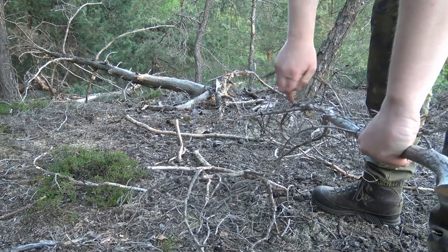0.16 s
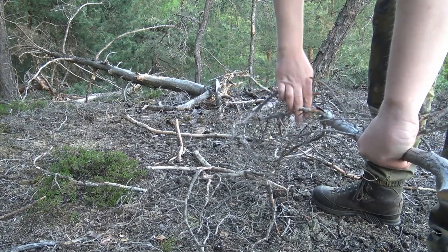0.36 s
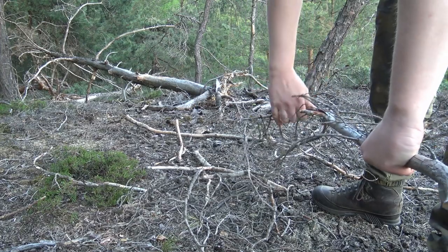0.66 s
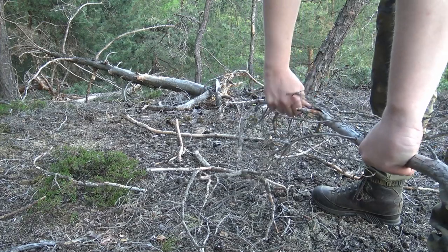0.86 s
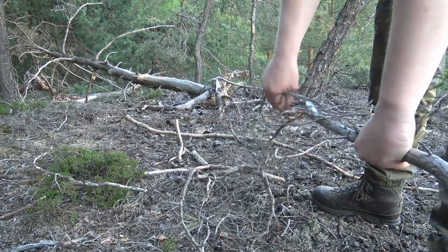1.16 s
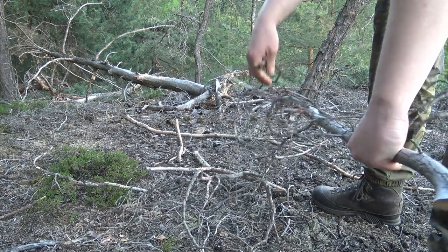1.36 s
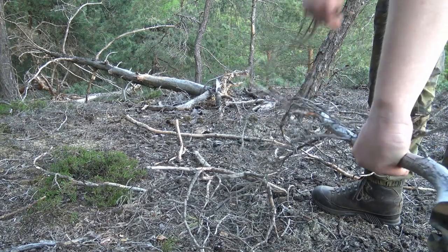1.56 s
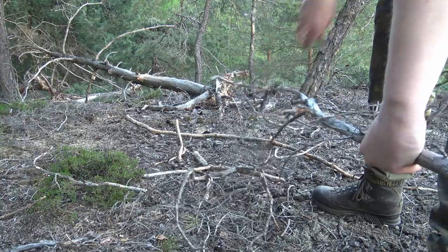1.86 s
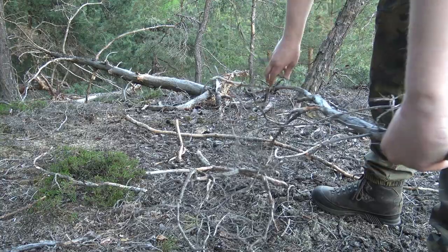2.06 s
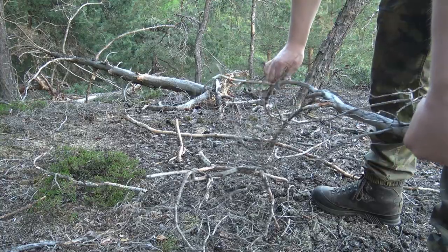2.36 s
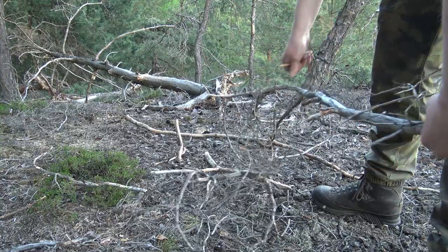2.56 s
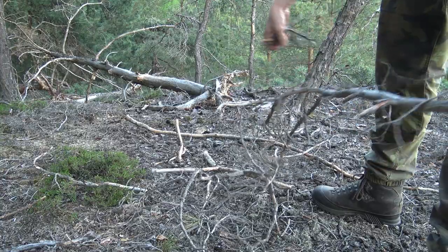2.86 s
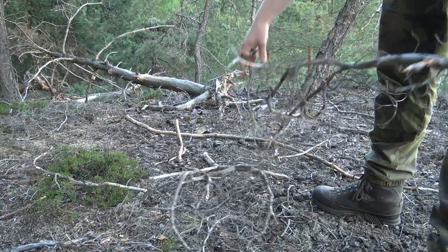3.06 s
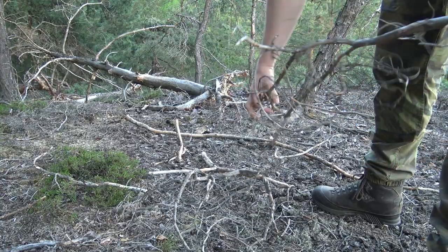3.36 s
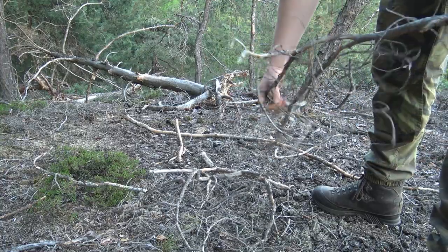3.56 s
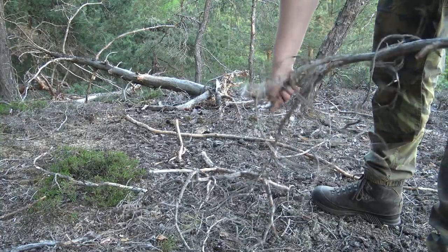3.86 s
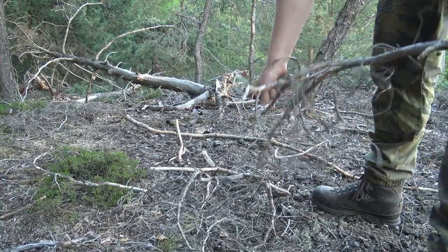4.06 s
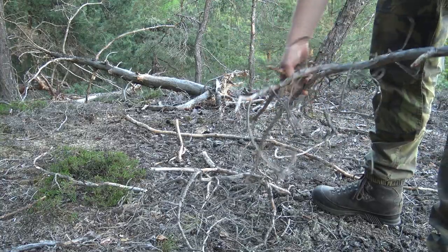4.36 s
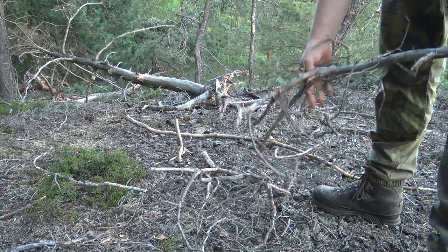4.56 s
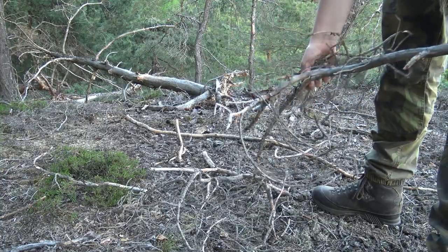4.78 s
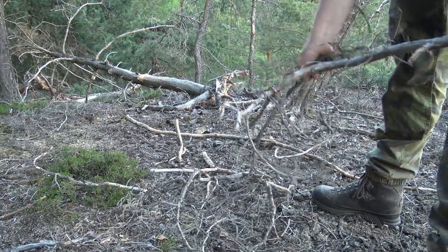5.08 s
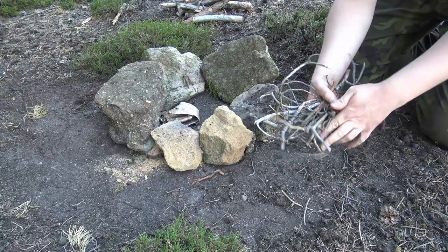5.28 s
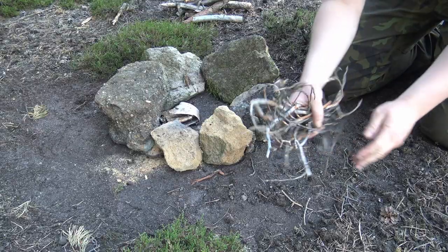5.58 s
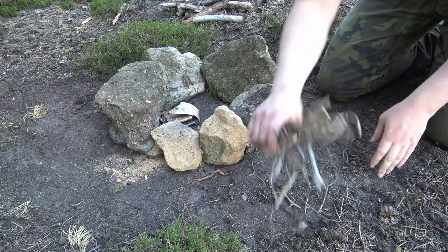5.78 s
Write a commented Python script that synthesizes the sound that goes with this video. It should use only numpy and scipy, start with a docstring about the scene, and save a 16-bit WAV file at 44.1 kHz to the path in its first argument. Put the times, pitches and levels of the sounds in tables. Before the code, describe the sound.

Outdoor stereo pickup close to a brittle branch being handled. Irregular cracks cluster around one second, pause, then return sharper and denser through the middle, over hissing twig rustle and dull knocks. A nearby bird's quick warble, a farther low whistle and thin high peeps fill the gaps. Finally the rustle fades and dry twigs land with a short, low thud in still air.

```python
"""Dry twigs are pulled and snapped off a dead branch close by: noise tears, a short ring and splinter fizz.
They scrape and rustle between the cracks: patchy noise with tiny clicks, over dull knocks of damped tones.
A near bird warbles, a farther one whistles low and a tiny one seeps high, all as gliding sines.
Echoes among pine trunks and a noise floor of still air surround them.
At the end a bundle of twigs drops on the ground with a thud."""
import sys
import numpy as np
from scipy import signal
from scipy.fft import rfft, irfft, next_fast_len
from scipy.io import wavfile
from scipy.ndimage import uniform_filter1d, minimum_filter1d, map_coordinates

SR = 44100
rng = np.random.default_rng(int(sys.argv[2]) if len(sys.argv) > 2 else 0)


def to_wav(s):
    """Save 16-bit WAV."""
    ch = np.atleast_2d(s).T  # columns
    pcm = np.round(np.clip(ch, -1, 1) * 32767)  # PCM
    wavfile.write(sys.argv[1], SR, pcm.astype(np.int16))


N = 261072


def amp(db):
    """Turn decibels into a plain factor."""
    return 10 ** (np.asarray(db) / 20)


def unit(x):
    """Scale a signal to an rms of 1."""
    return x / np.sqrt(np.mean(x ** 2) + 1e-20)


def along(points, hz):
    """Read a curve of (f/Hz, value) points on a log frequency axis."""
    f, v = np.transpose(points)
    return np.interp(np.log(hz + 1), np.log(f + 1), v)


def curves(rows):
    """Give one value per sample for each column after the time."""
    times, *columns = np.transpose(rows)
    return [np.interp(np.arange(N) / SR, times, column) for column in columns]


def wobble(rate):
    """Draw a smooth random curve with this many random knots a second."""
    knots = rng.standard_normal(int(N * rate / SR) + 4)
    return map_coordinates(knots, [np.arange(N) * rate / SR])


def filtered(x, response):
    """Filter x by a complex response of frequency."""
    m = next_fast_len(x.shape[-1] + 4096)
    return irfft(rfft(x, m) * response(np.fft.rfftfreq(m, 1 / SR)), m)[..., :x.shape[-1]]


def peak(hz, centre_hz, q):
    """A resonance of gain 1 at its centre, which rings only after it is struck."""
    damping = 1j * hz * centre_hz / q
    return damping / (centre_hz ** 2 - hz ** 2 + damping)


# steady fumbling with the branch: [t/s, thin twigs level/dB, thick wood level/dB]
GRIP_LEVELS = [(0.0, -42, -47), (0.18, -45.5, -51.5), (0.45, -44, -48), (0.88, -45.5, -52.5),
               (1.36, -47, -46.5), (1.54, -45, -54.5), (1.84, -46.5, -58), (2.0, -42, -57.5),
               (2.6, -41.5, -50.5), (2.79, -48.5, -45.5), (3.07, -55, -55), (3.5, -47.5, -53),
               (3.8, -40.5, -48), (4.27, -48.5, -56.5), (5.1, -43.5, -51.5), (5.33, -48, -61.5),
               (5.56, -59.5, -63), (5.92, -55.5, -55.5)]
# tugs that shake the branch: [t/s of the peak, twigs level/dB, wood level/dB, rise t/s, 60 dB fade t/s]
BRANCH_TUGS = [(0.25, -40.5, -54, 0.35, 0.9), (0.931, -31, -62, 0.044, 0.67),
               (0.974, -29, -30.5, 0.061, 0.19), (1.16, -39.5, -61, 0.27, 1.6),
               (2.48, -41, -56, 0.048, 2.1), (2.748, -35, -37.5, 0.048, 0.16),
               (2.831, -34.5, -38.5, 0.011, 0.86), (3.24, -38, -48.5, 0.26, 1.06),
               (3.51, -34.5, -45.5, 0.049, 0.064), (3.77, -46, -58, 1, 0.76),
               (3.878, -31, -38, 0.073, 0.59), (4.45, -40, -45.5, 0.74, 0.52),
               (4.688, -32, -41.5, 0.27, 0.71), (4.909, -32, -38, 0.022, 0.41),
               (5.233, -34, -47.5, 0.21, 0.23)]


def effort():
    """Gains of twigs and wood: the steady grip plus each tug, which swells and dies away."""
    t = np.arange(N) / SR
    power = amp(curves(GRIP_LEVELS)) ** 2
    for peak_s, twig_db, wood_db, rise_s, t60 in BRANCH_TUGS:
        rise_db = 40 * (t - peak_s) / rise_s  # it gains 40 dB during its rise
        fade_db = -60 * (t - peak_s) / t60
        shape_db = np.where(t < peak_s, rise_db, fade_db)
        power = power + amp([[twig_db], [wood_db]]) ** 2 * amp(shape_db) ** 2
    return np.sqrt(power)


def crackle(spectrum, rate, spread_db, life, share, patchy_db, patch):
    """Rubbing: patchy noise, gated in part by tiny bursts of very uneven size."""
    z = signal.stft(rng.standard_normal(N), nperseg=256)[2]
    # patch holds the smoothing widths across frequency and across time
    field = uniform_filter1d(rng.standard_normal(z.shape), size=patch[0], axis=0)
    field = uniform_filter1d(field, size=patch[1], axis=1)
    noise = signal.istft(z * amp(patchy_db * unit(field)), nperseg=256)[1][:N]
    sizes = amp(spread_db * np.minimum(rng.exponential(size=N), 1.7))
    starts = (rng.random(N) < rate / SR) * sizes
    fade = np.exp(-1 / (life * SR))
    bursts = signal.lfilter([1], [1, -fade], starts)  # a sudden start, then a fade
    share = np.clip(share, 0, 1)
    gate = np.sqrt(1 - share + share * unit(bursts) ** 2)
    return unit(filtered(noise * gate, lambda hz: amp(along(spectrum, hz))))


def ticks(rate, spread_db, centre_hz, octaves, cycles):
    """Bark flakes and twig tips flick off: each a click of a few cycles at its own pitch."""
    draws = rng.random((round(rate * N / SR), 2))  # place and size of each click
    hz = centre_hz * 2 ** (octaves * rng.standard_normal((len(draws), 1)))
    turns = np.minimum(hz, SR / 3) * np.arange(512) / SR
    size = amp(-spread_db * np.log(np.maximum(draws[:, 1:], .05)))
    clicks = size * np.sin(2 * np.pi * turns) * np.exp(-turns / cycles)
    spots = (draws[:, :1] * N).astype(int) + np.arange(512)
    return unit(np.bincount(spots.ravel(), clicks.ravel(), N + 512)[:N])


# colour of the hissing thin twigs: [f/Hz, relative level/dB per Hz]
TWIG_COLOUR = [(710, -18.5), (1200, -0.5), (5450, 1.5), (10300, 0), (14800, -6), (16000, -16), (16500, -43)]
# colour of the scraping thick wood: [f/Hz, relative level/dB per Hz]
WOOD_COLOUR = [(35, -64), (60, -11.5), (178, -5.5), (589, 2.5), (1250, -0.5), (4000, -2.5), (5200, -32),
               (8800, -120)]


def handling():
    """Thin twigs hiss and tick, thick wood scrapes lower; each jerk of the hand shakes both."""
    twig_gain, wood_gain = effort()
    jerk = np.clip(wobble(30), -3, 1.5)
    twigs = crackle(TWIG_COLOUR, rate=260, spread_db=4, life=.0018, share=.45, patchy_db=3.6, patch=(19, 3))
    twigs = twigs + amp(-12) * ticks(rate=240, spread_db=5, centre_hz=7000, octaves=.8, cycles=1.6)
    wood = crackle(WOOD_COLOUR, rate=110, spread_db=4.5, life=.003, share=.25, patchy_db=4, patch=(2, 12))
    wood = wood + amp(-7) * ticks(rate=140, spread_db=2.5, centre_hz=1500, octaves=.8, cycles=6)

    def balance():
        """A slow random left-right level wobble."""
        return amp(0.77 * wobble(7.3) * np.array([[1], [-1]]))

    rustle = twig_gain * amp(2.65 * jerk) * twigs * balance()
    scrape = wood_gain * amp(1.7 * jerk) * wood * balance()
    return rustle + scrape


# colour of the still air, with a far drone near 1 kHz: [f/Hz, relative level/dB per Hz]
AIR_COLOUR = [(20, -5), (60, 12.5), (200, 11.5), (700, 6.5), (950, 2), (1120, 24), (1350, -28), (3500, -7),
              (5300, -24), (15000, -31), (16500, -34)]
# how alike the air sounds on the left and right: [f/Hz, likeness from 0 to 1]
AIR_LIKENESS = [(60, 0.88), (380, 0.55), (2380, 1), (15000, 0.96)]


def air():
    """Still air is a gently wavering noise floor; a shared and an opposed noise set how alike the sides are."""
    def colours(hz):
        turn = np.arccos(np.clip(along(AIR_LIKENESS, hz), -1, 1)) / 2
        return amp(along(AIR_COLOUR, hz)) * [np.cos(turn), np.sin(turn)]

    mid, side = filtered(rng.standard_normal((2, N)), colours)
    return amp(-62.0 + 0.7 * wobble(4.3)) * unit(np.array([mid + side, mid - side]))


# echoes among the trunks: [f/Hz, 60 dB fade t/s]
TRUNK_ECHOES = [(300, 0.57), (3000, 0.61), (12000, 0.4)]


def trees(x):
    """Each frequency of the echo dies at its own speed; the two sides differ a little."""
    hz, t, z = signal.stft(rng.standard_normal((2, SR // 2)), SR, nperseg=256)
    fade = amp(-60 * t / along(TRUNK_ECHOES, hz)[:, None])
    mid, side = signal.istft(z * fade, SR, nperseg=256)[1]
    tail = (mid + amp(-34.0) * side * [[1], [-1]]) / np.linalg.norm(mid)
    late = np.pad(x, (300, 0))  # the first echo comes 300 samples late
    return signal.fftconvolve(late[None], tail, axes=1)[:, :N]


# snaps: [t/s, nominal peak level/dB, ring f/Hz, woody part setting level/dB, brittle parts setting level/dB]
TWIG_SNAPS = [(0.2201, -13.5, 1430, -15, -8), (0.249, -20.5, 12500, -28, -22), (0.3538, -20, 3700, 3, -17),
              (0.3653, -20, 1640, -7, -15), (0.628, -21.5, 1790, 1, -9), (0.688, -28, 4600, -8, -26),
              (0.7989, -16, 9500, 15, 20.5), (0.8974, -22.5, 9000, -30, 6), (0.9189, -5, 2560, -14, -9),
              (0.9422, -12, 2300, -43, -12), (0.9681, -11.5, 4640, -21, -11), (0.99, -24, 2720, -3, -14),
              (1, -19, 2500, -5, -19), (1.012, -18, 1410, -3, -33), (1.046, -22, 2770, 0, -35),
              (1.138, -20, 7060, -20, -3), (1.157, -19, 10300, -25, 10), (1.212, -23, 2080, -7, -44),
              (1.2215, -19, 2490, -14, -54), (1.2387, -14, 2490, -13, -64), (1.3798, -16, 2390, 4, -30),
              (1.596, -20, 1880, -48.5, -2), (1.93, -12, 10000, -5.5, -10.5), (2.2373, -21.5, 5770, 0, -11),
              (2.469, -4.5, 2460, -17, -8.5), (2.475, -2.5, 5230, -28, 3), (2.736, -17.5, 5970, -38, -29),
              (2.8107, -8.5, 4340, -5, -2), (2.843, -26, 3080, 3, -18), (2.9043, -11, 3440, -17, -18),
              (3.3453, -23, 10100, -25, -6), (3.452, -6.5, 8980, -50, -34), (3.503, -15.5, 11200, -32, -16),
              (3.56, -9, 7000, -15, -32), (3.5656, -6, 8880, -15, -8), (3.6117, -1, 4600, -24, -11),
              (3.6588, -4.5, 4920, -15, -7), (3.8065, -17.5, 3470, -66, -44),
              (3.8187, -4.5, 4850, -12.5, -12), (3.8657, 5.5, 5455, -19.5, -21),
              (3.8887, -10, 10200, -41, -35), (3.926, -10, 5550, -18, -5), (4.4645, -15, 9200, -3.5, -9),
              (4.552, -7.5, 3400, -40, -9.5), (4.6755, -11, 9200, -17, -12), (4.79, -6.5, 9300, -12, -5),
              (4.85, -8, 8600, -49, -11), (4.8828, 4, 5760, -8.5, -15), (4.9108, -10.5, 3950, -11, -8),
              (5.1043, -25, 2090, -2, -10), (5.214, -13.5, 6600, -19, -29), (5.237, -17.5, 4970, -22, -35),
              (5.4306, -26.5, 3530, -35, -20), (5.4837, -24, 4160, -18, -20),
              (5.801, -27.5, 1860, -19, -10)]


def snaps():
    """Fibres tear for a few ms, the stub rings briefly (thick, low stubs longer), splinters keep fizzing."""
    crest_db = 14  # nominal peak over the rms of the first 256 samples (about 6 ms)
    out, t = np.zeros((2, N + SR)), np.arange(SR // 8) / SR
    parting = amp(2.5) * np.exp(-((t - .0011) / .0002) ** 2)  # the last fibres let go at once
    for s, db, hz, woody_db, brittle_db in TWIG_SNAPS:
        # a main tear, a sharper start, a long faint fizz and the parting
        tear = amp(-60 * t / .012) + amp(2 - 60 * t / .0025) + amp(-24 - 60 * t / .07) + parting
        uneven_db = 3 * rng.standard_normal(len(t) // 32 + 1).clip(-2, 1)
        tear = tear * amp(uneven_db).repeat(32)[:len(t)]  # it rips unevenly
        ring = amp(-60 * t / (0.002 + 62 / hz))
        shapes = (1 - np.exp(-(t / 0.0007) ** 2)) * np.array([ring, tear, tear, tear])
        # parts in order: ring, woody, brittle, highest brittle
        gains = amp([[-3], [woody_db], [0.43 * brittle_db + 2.5], [brittle_db + 6.5]])
        modes_hz = 1300 * 2.8 ** rng.random(4)  # every stick has its own woody modes

        def colours(f):
            woody = peak(f, 2220, 0.44) ** 2 * sum(peak(f, m, 11) for m in modes_hz)
            return np.array([peak(f, hz, 3.3), woody, peak(f, 6270, 0.96) ** 2, peak(f, 10800, 1.7) ** 2])

        shaking = rng.standard_normal((4, len(t)))
        shaking[0] += .25 * np.sin(2 * np.pi * hz * t)  # the stub's own note under the noise
        parts = filtered(shapes * shaking, colours)
        parts /= np.sqrt(np.mean(parts[:, :256] ** 2, axis=1, keepdims=True))
        crack = (gains * parts).sum(axis=0)
        crack = crack / np.std(crack[:256])
        offset_db = rng.normal(0, 1)  # a small random left-right level offset for each snap
        sides = amp(db - crest_db + offset_db * np.array([[1], [-1]]))
        out[:, round(s * SR):][:, :len(t)] += sides * crack
    return out[:, :N] * amp([[-.6], [.6]])  # the breaking hand is a little to the right


# dull knocks of the branch and the bundle: [t/s, level/dB before onset and low cut, f/Hz, 60 dB fade t/s]
DULL_KNOCKS = [(0.963, -9.5, 920, 0.013), (2.468, -16, 201, 0.0033), (2.812, -16, 583, 0.071),
               (2.829, -30.5, 163, 0.12), (3.452, -17, 142, 0.0091), (3.902, -30, 184, 0.11),
               (4.629, -21, 604, 0.013), (4.641, -10.5, 1260, 0.028), (4.743, -21, 412, 0.0093),
               (5.759, -4.5, 292, 0.032), (5.836, -27, 580, 0.0076)]


def thuds():
    """A soft push rings one low, damped mode, with two quicker ones above it."""
    out, t = np.zeros(N + SR), np.arange(SR // 8) / SR
    for s, db, hz, t60 in DULL_KNOCKS:
        turn = 2 * np.pi * hz * t
        second = amp(-3.0 - 60 * t / 0.017) * np.sin(1.88 * turn)
        third = amp(-5.5 - 60 * t / 0.014) * np.sin(3.04 * turn)
        push = 1 - np.exp(-t / (0.14 * t60))
        ring = amp(db - 60 * t / t60) * (-np.cos(turn) + second - third) * push
        corner_hz = 0.045 * hz * hz * t60  # a knock of many cycles pushes little air below its pitch
        knock = filtered(ring, lambda f: (1j * f / (corner_hz + 1j * f)) ** 2)
        out[round(s * SR):][:len(t)] += knock
    return out[:N] * amp([[1.8], [-1.8]])  # left raised, right lowered


def song(notes, settle_s, arch_hz, swell, tremble_hz, flutter_db):
    """Each note is a sine sliding to its end pitch, fastest at first, bowed up by arch_hz, under a swell."""
    out = np.zeros(N + SR)
    tremble = tremble_hz * wobble(140)  # unsteady pitch
    flutter = amp(flutter_db * wobble(110))  # unsteady loudness
    for s, length, from_hz, to_hz, db in notes:
        start = round(s * SR)
        t = np.arange(min(round(length * SR), N - start)) / SR
        slide = np.expm1(-t / settle_s) / np.expm1(-length / settle_s)
        arch = np.sin(np.pi * t / length)
        hz = from_hz + (to_hz - from_hz) * slide + arch_hz * arch + tremble[start:][:len(t)]
        out[start:][:len(t)] += amp(db) * arch ** swell * np.sin(2 * np.pi * np.cumsum(hz) / SR)
    return np.sqrt(2) * flutter * out[:N]


# low whistles: [t/s, length t/s, from f/Hz, to f/Hz, rms level/dB at the top of the swell before flutter]
LOW_WHISTLES = [(1.53, 0.27, 2100, 1694, -51.5), (1.91, 0.23, 2314, 1758, -53.5),
                (2.2, 0.088, 1880, 1777, -54), (2.62, 0.051, 2345, 2330, -51.5),
                (5.49, 0.157, 1664, 1880, -50.5), (5.7, 0.076, 2140, 2377, -51.5),
                (5.785, 0.14, 2147, 1754, -48.5)]


def whistle():
    """The farther bird whistles low notes that slide early and tremble little."""
    return song(LOW_WHISTLES, settle_s=.05, arch_hz=0, swell=.3, tremble_hz=9, flutter_db=1.5)


# high trembling notes: [t/s, length t/s, from f/Hz, to f/Hz, rms level/dB at the swell's top before flutter]
HIGH_SEEPS = [(1.6, 0.16, 8220, 8400, -52), (1.75, 0.073, 7850, 8000, -48), (1.94, 0.044, 7800, 7700, -53),
              (2.06, 0.091, 8200, 8340, -45)]


def seep():
    """The tiny bird's high notes tremble strongly in pitch."""
    return song(HIGH_SEEPS, settle_s=0.42, arch_hz=0, swell=0.57, tremble_hz=170, flutter_db=-1.5)


# warbled glides: [t/s, length t/s, from f/Hz, to f/Hz, rms level/dB at the top of the swell before flutter]
WARBLED_GLIDES = [(2.27, 0.018, 3530, 2800, -39), (2.296, 0.013, 3130, 3700, -45),
                  (2.312, 0.048, 2950, 3950, -36), (2.382, 0.024, 3410, 2650, -36.5),
                  (2.547, 0.022, 3340, 2940, -39.5), (2.91, 0.03, 3004, 2910, -37),
                  (2.941, 0.019, 3780, 2850, -41), (3.052, 0.019, 2960, 2660, -43.5),
                  (3.123, 0.02, 2830, 3130, -42), (3.143, .018, 2514, 3230, -43),
                  (3.158, 0.025, 3100, 2790, -37), (3.268, 0.012, 3035, 2890, -38),
                  (3.358, 0.016, 3300, 3190, -42.5), (3.459, 0.017, 3370, 2900, -42),
                  (3.543, 0.044, 3080, 3650, -40), (3.638, .018, 3270, 3520, -39),
                  (4.03, 0.013, 3820, 3160, -36.5), (4.04, 0.025, 3600, 2660, -36),
                  (4.072, 0.036, 2530, 2770, -44.5), (4.094, 0.016, 2760, 2110, -44),
                  (4.181, 0.024, 3640, 2530, -37), (4.34, 0.04, 3600, 2480, -36),
                  (4.382, 0.034, 2710, 2715, -45), (5.333, 0.013, 4730, 3750, -59),
                  (5.343, 0.022, 3730, 3250, -47), (5.398, 0.051, 3730, 3480, -52),
                  (5.418, 0.0104, 3060, 4560, -48), (5.44, 0.014, 3670, 3000, -39),
                  (5.447, 0.049, 3100, 4450, -39), (5.495, 0.016, 3950, 4080, -39.5),
                  (5.508, 0.0065, 4170, 2570, -39), (5.574, 0.011, 3970, 4850, -50),
                  (5.584, 0.012, 3600, 4400, -48.5), (5.6, 0.01, 3500, 2700, -50),
                  (5.617, 0.016, 2890, 4930, -45.5), (5.631, 0.0118, 3300, 4620, -48),
                  (5.645, 0.018, 3680, 3250, -40.5), (5.661, 0.012, 3340, 2610, -41),
                  (5.807, 0.0144, 3580, 2520, -49)]


def warble():
    """The near bird strings short, bowed glides into a warble."""
    return song(WARBLED_GLIDES, settle_s=.3, arch_hz=60, swell=.6, tremble_hz=40, flutter_db=1.6)


def birds():
    """Three singers, direct and as sent into the trees; the far whistler echoes most."""
    low = whistle()
    others = seep() + warble()
    # the others are set left to offset the microphone pair's lean, so they sound central
    direct = others * amp([[1.3], [-1.3]]) + low
    echoing = amp(-9) * others + amp(-5) * low
    return direct, echoing


def scene():
    """Add the branch, the birds, their echoes and the air."""
    near = snaps() + handling()
    direct_birds, echoing_birds = birds()
    echoes = trees(amp(-18.0) * near.mean(axis=0) + echoing_birds)
    return near + thuds() + direct_birds + echoes + air()


# colour difference of the microphone pair: [f/Hz, left minus right level/dB]
PAIR_LEAN = [(60, 1), (290, -0.5), (640, -3.5), (1410, -4.5), (6820, -2), (15000, 0.5)]


def record(dry):
    """Two microphones differ in colour; a limiter dips around the hardest cracks; the top treble is cut."""
    x = filtered(dry, lambda hz: amp(along(PAIR_LEAN, hz) * np.array([[.5], [-.5]])))
    needed = np.minimum(1, amp(-2.5) / (np.abs(x).max(axis=0) + 1e-9))
    # the dip starts just ahead of a loud peak and has smooth edges
    x = x * uniform_filter1d(minimum_filter1d(needed, size=221), size=45)
    top_hz = 16900  # nothing passes from here up
    return filtered(x, lambda hz: np.where(hz < 15900, 1, amp(-21)) * (hz < top_hz))


dry = scene()
out = record(dry)
to_wav(out)
```